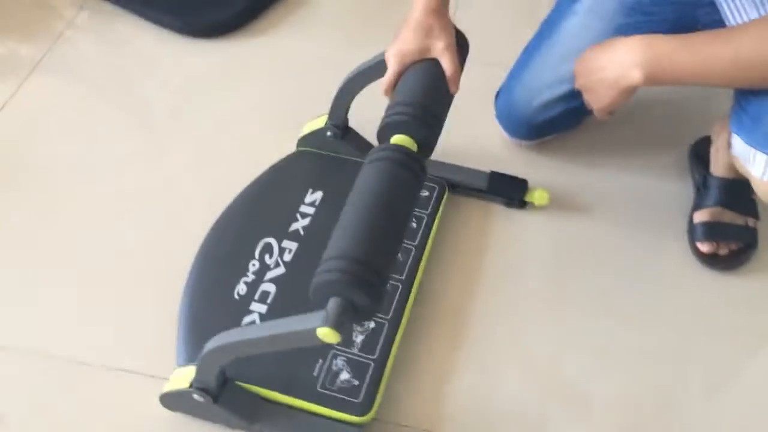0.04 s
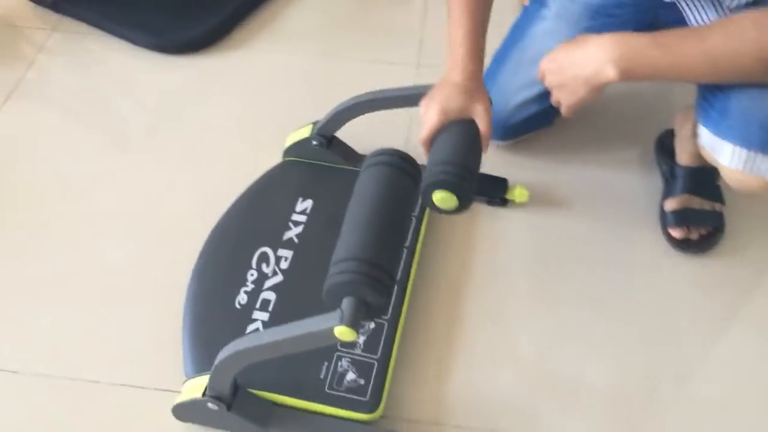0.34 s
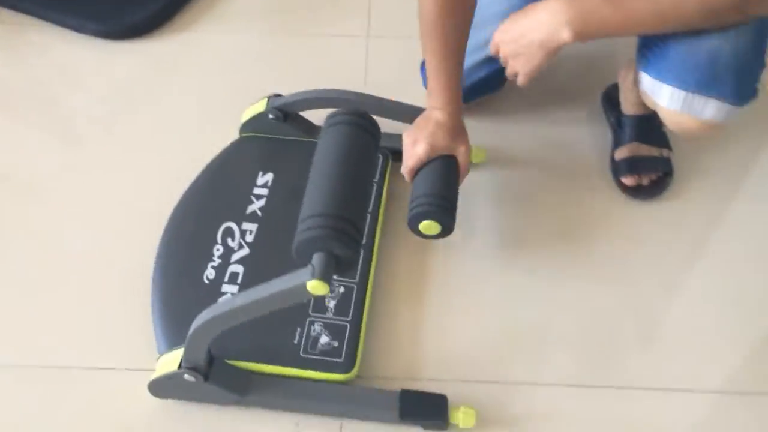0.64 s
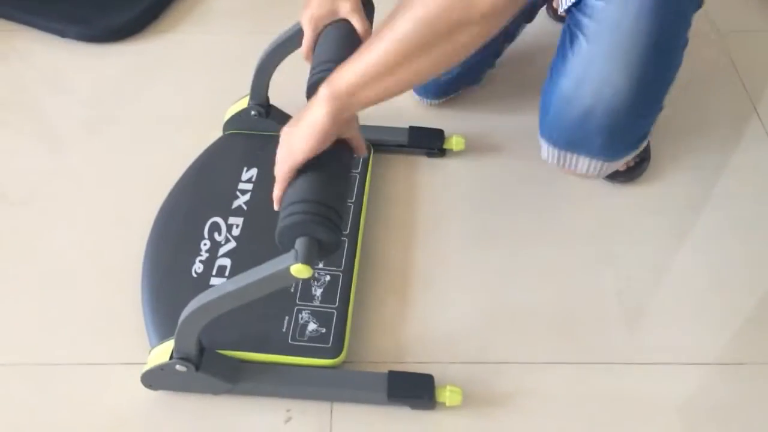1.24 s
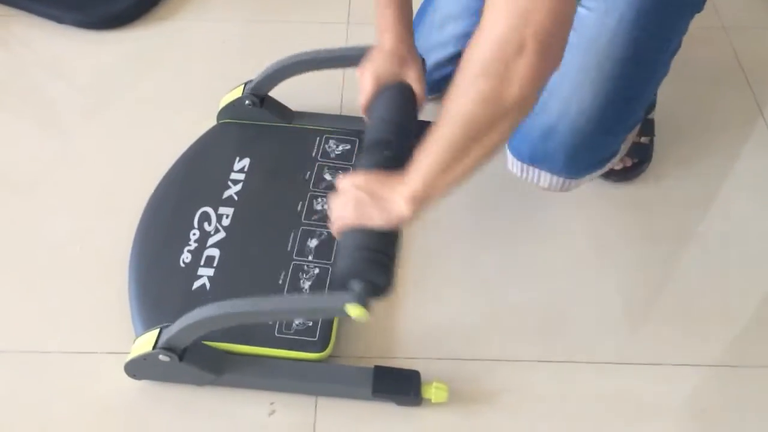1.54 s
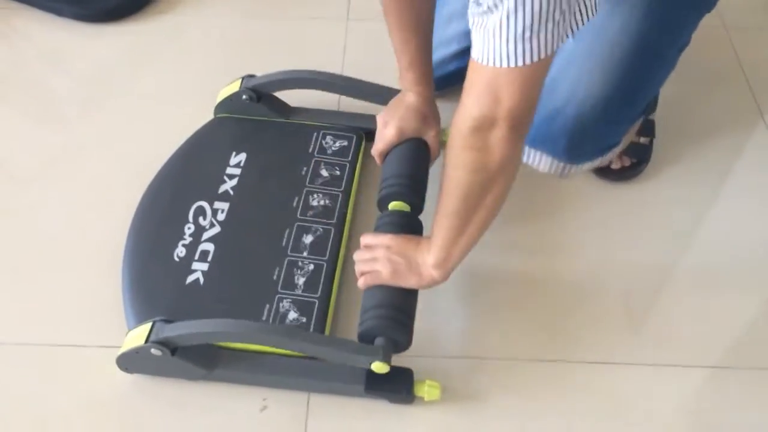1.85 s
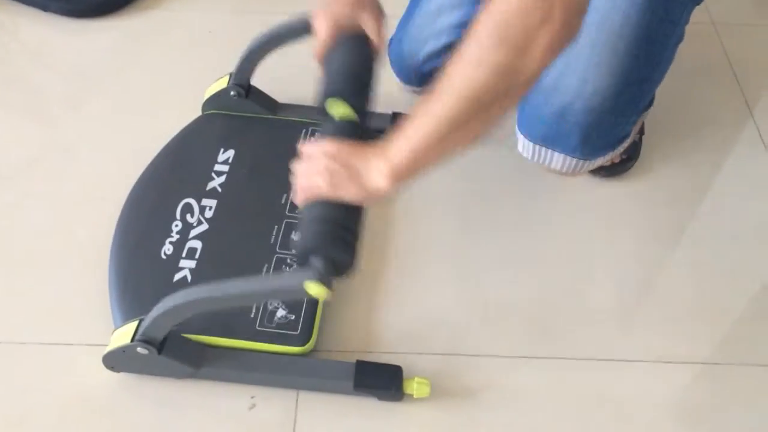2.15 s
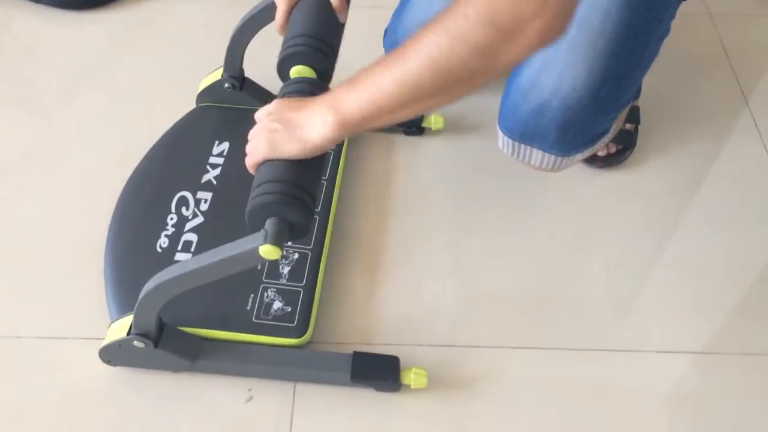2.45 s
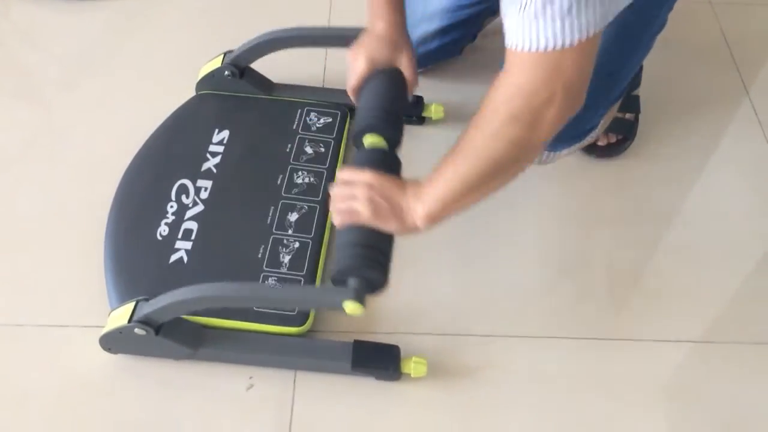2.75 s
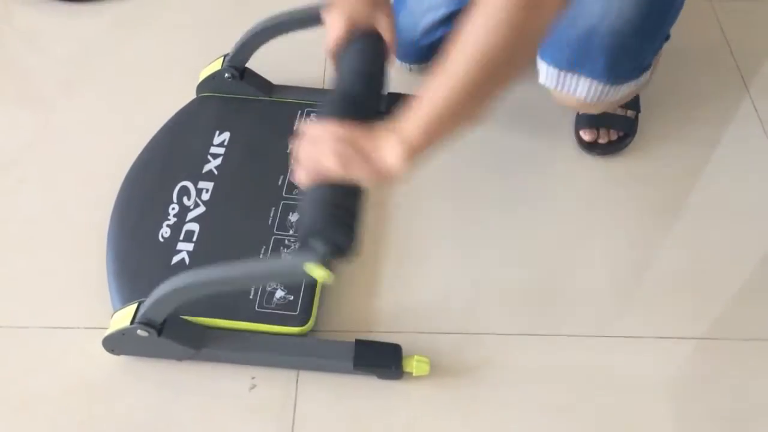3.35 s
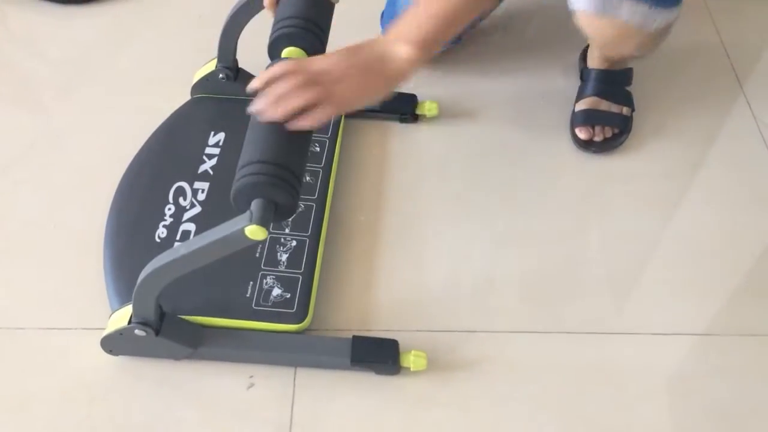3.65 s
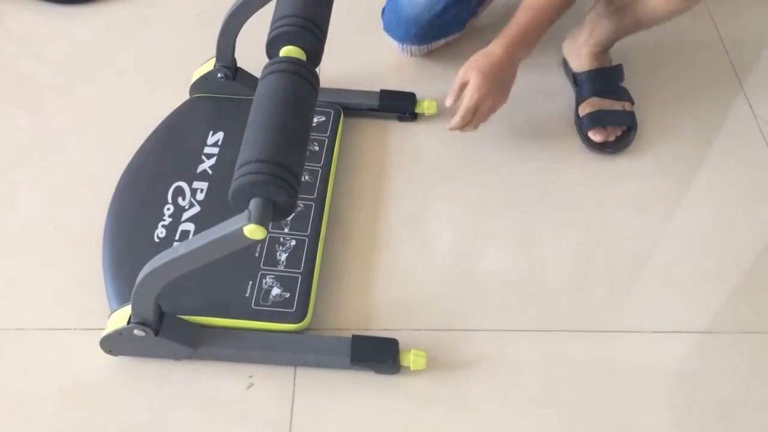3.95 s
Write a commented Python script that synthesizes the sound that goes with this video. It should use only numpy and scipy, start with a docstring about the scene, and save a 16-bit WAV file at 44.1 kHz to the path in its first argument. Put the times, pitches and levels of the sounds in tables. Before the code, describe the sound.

Sharp metal clacks from a sprung exercise machine handled on tiles, its pivot squeaking softly.

```python
"""A small sprung exercise machine is handled on the tiled floor of a hard room.
First its two steel arms clack against their stops and ring while the frame knocks on the tiles.
Then the padded bar is pushed down and let up: hands rub, foam slides, joints tick, a pivot squeaks,
with a soft clack at 1.2 s and a few light knocks. At 3.6 s, just after the loudest squeak,
an arm clacks and rings again, and a last rub trails off over the room tone."""
import sys
import numpy as np
from scipy import signal
from scipy.fft import rfft, irfft
from scipy.io import wavfile
from scipy.ndimage import uniform_filter1d

SR = 44100
rng = np.random.default_rng(int(sys.argv[2]) if len(sys.argv) > 2 else 0)


def put_to_file(sound):
    """Save the sound as 16-bit audio at rate SR, in the file named by the first command-line argument."""
    columns = np.atleast_2d(sound).T  # one column per channel
    safe = np.clip(columns, -1, 1)
    whole_steps = np.round(safe * 32767)
    wavfile.write(sys.argv[1], SR, whole_steps.astype(np.int16))


N = 176400

# an arm hits its stop: t/s, level/dB, treble corner/Hz, chatter/s, far arm ring/dB, near arm ring/dB
CLACKS = [(0.0527, -19, 12000, 0.0064, -56, -46), (.0815, -23.5, 14000, 0.0065, -67, -49.5),
          (0.1099, -11.5, 14000, 0.0081, -27.5, -43), (1.229, -31.5, 5100, 0.013, -72, -57),
          (3.5944, -22.5, 11300, 0.014, -66, -38)]
# the frame bumps the floor: t/s, level/dB, f/Hz, decay/s, frame boom/dB, grit/share
KNOCKS = [(.0495, -6.5, 960, 0.00085, -64.5, 0.25), (.052, -17.5, 215, 0.0096, -37, 0.34),
          (.055, -19.5, 560, 0.0035, -50, 0.17), (0.082, -38, 1110, 0.007, -57.5, 0.55),
          (.105, -23, 556, 0.0042, -48, 0.99), (.111, -16.5, 196, 0.0063, -29, 0.22),
          (.1125, -22.5, 488.5, 0.012, -63, 0.25), (1.191, -30.5, 538, 0.0053, -55, 0.27),
          (1.197, -26, 202, 0.019, -52, 0.22), (1.2185, -27.5, 528, 0.0072, -59, 0.07),
          (1.2227, -22.5, 193, 0.0091, -35, 0.11), (1.454, -26, 195, 0.0047, -40, 0.16),
          (1.477, -27, 178, 0.009, -63, 0.17), (1.537, -28.5, 181, 0.012, -46, 0.24),
          (1.578, -38, 256, 0.0086, -57, 0.24), (2.358, -32, 520, 0.007, -52.5, 0.16),
          (2.364, -36, 204, 0.015, -58, 0.32), (3.569, -30.5, 185, 0.017, -45, .12),
          (3.583, -26, 529, 0.007, -50, 0.28), (3.596, -33.5, 169.3, 0.019, -37, 0.14),
          (3.59, -29.5, 91, 0.016, -58, 0.2), (3.672, -30, 179.6, .016, -54, 0.31),
          (3.785, -35.5, 185, 0.015, -48.5, 0.35)]


def amp(db):
    """Decibels to gain."""
    return 10 ** (np.asarray(db) / 20)


def unit(x):
    """Scales to rms 1."""
    return x / np.sqrt(np.mean(x ** 2) + 1e-20)


def curve(points, hz):
    """Interpolates a table on a log-frequency axis."""
    f, value = np.transpose(points)
    return np.interp(np.log(hz + 1), np.log(f + 1), value)


def rolloff(ratio, order=2):
    """Filter slope in dB: flat below ratio 1, falling 6 dB an octave per order above it."""
    return -10 * np.log10(1 + ratio ** (2 * order))


def add(mix, s, sound):
    """Mixes a sound in at s seconds."""
    part = mix[max(round(s * SR), 0):][:len(sound)]
    part += sound[:len(part)]


def noise(colour, size):
    """Noise of rms 1, its spectrum shaped by colour(Hz) in dB."""
    gain = amp(colour(np.fft.rfftfreq(size, 1 / SR)))
    return unit(irfft(rfft(rng.standard_normal(size)) * gain, size))


def wander(size, smooth_s):
    """Smooth random drift of rms 1."""
    return noise(lambda f: rolloff(2 * f * smooth_s), size)


def room_tone(level_db=-49.5, low_cut_hz=38):
    """The room's steady bed of noise, mostly low rumble."""
    colour = [(15, -40), (25, -10.5), (81, -4), (103, -7), (202, -10.5), (231, -19.5), (271, -15.5),
              (363, -25.5), (573, -26), (673, -28.5), (1210, -30.5), (1630, -35), (2630, -38.5),
              (15000, -56.5)]  # spectrum: f/Hz, level/dB
    return amp(level_db) * noise(lambda f: curve(colour, f) + rolloff(low_cut_hz / (f + 1), order=3), N)


def reverb(sound, predelay_s=.004, flutter_db=1.5, flutter_s=.0055):
    """Dense reflections from tile and walls; the bass lingers longest."""
    decay = [(100, 1), (250, 0.71), (600, .6), (1300, 0.41), (3000, 0.66), (7000, 0.56), (14000, .36)]  # reverb time: f/Hz, t60/s
    wet = [(100, -8), (220, -2), (600, -6.5), (1500, -4.5), (5000, -7), (14000, -6)]  # reverb against the direct sound: f/Hz, level/dB
    hz, t, bands = signal.stft(rng.standard_normal(SR), SR, nperseg=256)
    rate = np.log(1000) / curve(decay, hz)[:, None]
    envelope = np.exp(-rate * t) * np.sqrt(2 * rate / SR)  # unit energy in each band
    tail = signal.istft(bands * amp(curve(wet, hz))[:, None] * envelope, SR, nperseg=256)[1]
    tail *= amp(flutter_db * wander(len(tail), flutter_s))  # reflections arrive unevenly
    out = np.zeros(N)
    add(out, predelay_s, signal.fftconvolve(sound, tail)[:N])
    return out


def friction(strokes, colour, grain_db=1):
    """Grainy friction noise swells and fades with each stroke."""
    t = np.arange(N) / SR
    power = sum(amp(db) ** 2 * np.exp(-((t - s) / half) ** 2) for s, half, db in strokes)
    grain = amp(grain_db * unit(uniform_filter1d(rng.standard_normal(N), size=180)))
    return np.sqrt(power) * unit(grain * noise(lambda f: curve(colour, f), N))


def slides():
    """Foam and cloth slide with a fine hiss."""
    strokes = [(.01, 0.1, -52.5), (.47, 0.14, -61), (.62, .05, -64.5), (1.52, .012, -66),
               (2.205, 0.0081, -61.5), (3.05, 0.2, -73), (3.785, 0.0094, -57.5)]  # swells of hiss: centre t/s, half length/s, level/dB
    colour = [(1000, -7.5), (3300, 0.5), (5000, -1.5), (9000, -6.5), (15000, -12)]  # spectrum: f/Hz, level/dB
    return friction(strokes, colour)


def rubs():
    """Hands and foam rollers rub with a dull rustle."""
    strokes = [(0.02, 0.036, -61.5), (0.439, 0.058, -56), (0.613, .05, -67), (1.501, 0.056, -54.5),
               (1.61, 0.082, -55), (1.804, 0.11, -59.5), (2.118, 0.024, -54.5), (2.207, 0.022, -53),
               (2.649, 0.016, -66.5), (2.989, 0.085, -59.5), (3.106, 0.052, -61), (3.438, 0.1, -55),
               (3.92, 0.36, -57.5)]  # swells of rustle: centre t/s, half length/s, level/dB
    colour = [(150, -6), (450, 5.5), (750, 2), (1300, 0.5), (2000, -5), (3200, -11.5), (5000, -20.5),
              (10000, -22.5), (15000, -30.5)]  # spectrum: f/Hz, level/dB
    return friction(strokes, colour)


def squeaks(slip_s=.0017):
    """The pivot sticks and slips; uneven slips add a tone at half the pitch."""
    # squeaks: t/s, length/s, level/dB, start f/Hz, end f/Hz, pitch arch/share, subtone/dB, jitter/share
    glides = [(0.417, 0.079, -57, 1290, 1342, 0.0049, -21.5, 0.019),
              (.525, 0.06, -52, 1373, 1438, 0.0045, -24.5, .006),
              (1.677, 0.057, -55.5, 1385, 1426, 0.0066, -20, .015),
              (2.191, 0.028, -48.5, 1333, 1292, .03, 0, .15),
              (3.394, 0.057, -44, 1236, 1153, .085, -8.5, 0.035)]
    out = np.zeros(N)
    for s, length, db, start_hz, end_hz, arch, sub_db, rough in glides:
        progress = np.arange(0, length, 1 / SR) / length
        arc = np.sin(np.pi * progress)
        jitter = wander(SR, slip_s)[:len(progress)]
        hz = (start_hz + (end_hz - start_hz) * progress) * (1 + arch * arc + rough * jitter)
        phase = 2 * np.pi * np.cumsum(hz) / SR
        tone = np.sin(phase) + amp(sub_db) * np.sin(phase / 2)
        add(out, s, amp(db) * np.sqrt(abs(arc)) * tone)
    return out


def ticks(top_hz=12000):
    """Short dry clicks, and the bright snap of an arm hitting its stop."""
    clicks = [(.0425, -29, 1190, 1.8, 0.01), (.0815, -21.5, 4400, .4, 0.009),
              (1.185, -43.5, 1700, 0.93, 0.013), (1.1915, -44.5, 1200, 0.74, 0.01),
              (1.22, -43, 1800, 1.7, 0.012), (1.229, -40.5, 1430, .3, 0.025),
              (1.6302, -44, 7200, 0.19, .004), (1.6314, -39, 3740, 2.3, 0.0026),
              (2.338, -46, 1700, 0.81, .012), (2.359, -50.5, 1500, 1.3, 0.0058),
              (3.488, -50, 1180, 1.6, 0.01), (3.547, -44, 900, 1.3, 0.015),
              (3.5537, -36, 1200, 1.37, 0.017), (3.595, -21.5, 4930, 0.22, 0.004)]  # clicks and snaps: t/s, level/dB, centre f/Hz, width/octaves, decay/s
    out, t = np.zeros(N), np.arange(4096) / SR
    for s, db, hz, octaves, decay in clicks:
        burst = noise(lambda f: -20 * np.log10(1 + (np.log2((f + 1) / hz) / octaves) ** 2)
                      + rolloff(f / (3.2 * hz)) + rolloff(f / top_hz), len(t))
        add(out, s, amp(db) * burst * np.exp(-t / decay))
    return out


def ring(modes, rise_s, waver=0, waver_s=.016):
    """One second of dying modes; with waver, a loose part makes each sway in level and phase."""
    t = np.arange(SR) / SR
    out = np.zeros(SR)
    for hz, db, t60 in modes:
        sway = 1 + waver * (wander(SR, waver_s) + 1j * wander(SR, waver_s)) if waver else 1
        out += amp(db - 60 * t / t60) * (sway * np.exp(2j * np.pi * hz * t)).imag
    return (1 - np.exp(-t / rise_s)) * out


def frame_boom():
    """The frame booms on after each knock."""
    modes = [(82.4, -7.5, .6), (120, -14.5, 0.36), (186.8, -9.5, 0.34), (198.7, 3.5, 0.8), (219, -4.5, 0.7),
             (258, -11.5, 1), (413, -7, 0.13), (477, -8, 0.5)]  # frame resonances: f/Hz, level/dB, t60/s
    boom = ring(modes, rise_s=.008)
    out = np.zeros(N)
    for s, _, _, _, boom_db, _ in KNOCKS:
        add(out, s, amp(boom_db) * boom)
    return out


def knocks():
    """The frame bumps the tiles: short, damped thuds with grit around their pitch."""
    out, t = np.zeros(N), np.arange(8192) / SR
    for s, db, hz, decay, _, grit_share in KNOCKS:
        grit = noise(lambda f: rolloff(f / (2.1 * hz)) + rolloff(.5 * hz / (f + 1)), len(t))
        thud = np.sin(2 * np.pi * hz * t) + grit_share * grit
        envelope = 2 * t / decay * np.exp(1 - 2 * t / decay)
        add(out, s, amp(db) * envelope * thud)
    return out


def arm_ring():
    """Both steel arms ring on after each clack."""
    # resonances of each arm: f/Hz, level/dB, t60/s
    far_modes = [(654, -13.5, .6), (910, -14, .6), (1010, -11.5, 0.35), (1190, -12, 0.42),
                 (1218, -10.5, .55), (1320, -14.5, .55), (3417, -9.5, .35), (3455, 2.5, 0.39),
                 (4077, -7, .44), (4570, -12, .4), (6509, -12.5, .33), (8130, -6.5, 0.072)]
    near_modes = [(967, -4.5, .4), (1112, -3.5, 0.18), (1280, -4, 0.8), (2470, -5, 0.44), (4130, -8, 0.3),
                  (4400, -7.5, 0.3), (4790, -3.5, 0.22), (5830, -7.5, .3), (9400, -14, .2),
                  (13200, -15, .1)]
    far, near = (ring(modes, rise_s=.002, waver=.4) for modes in (far_modes, near_modes))
    out = np.zeros(N)
    for s, _, _, _, far_db, near_db in CLACKS:
        add(out, s, amp(far_db) * far + amp(near_db) * near)
    return out


def clacks(attack_s=.0005):
    """A steel arm chatters on its stop for a few milliseconds."""
    colour = [(60, -9.5), (200, 4), (450, 1.5), (750, -5), (1200, 6), (1800, -2), (2900, -5), (4300, -1),
              (7000, -4), (10000, -8), (13500, -6.5), (15200, -13)]  # chatter spectrum: f/Hz, level/dB
    out, t = np.zeros(N), np.arange(4096) / SR
    for s, db, corner_hz, chatter_s, _, _ in CLACKS:
        burst = noise(lambda f: curve(colour, f) + rolloff(f / corner_hz), len(t))
        envelope = np.minimum(t / attack_s, 1) * np.exp(-(t / chatter_s) ** 1.12)
        add(out, s, amp(db) * envelope * burst)
    return out


def machine(low_cut_hz=65):
    """The machine's hits and friction heard from one direction; it radiates little deep bass."""
    sound = clacks() + knocks() + ticks() + squeaks() + rubs() + slides()
    return signal.sosfilt(signal.butter(2, low_cut_hz, "highpass", fs=SR, output="sos"), sound)


def scene(walls=3):
    """Room tone, the machine, its reflections and its ringing; each wall returns its own view of it."""
    bed = room_tone()
    direct = machine()
    reflections = sum(reverb(machine()) for _ in range(walls)) / np.sqrt(walls)
    return (bed + direct + reflections + frame_boom() + arm_ring())[None]


def record(dry):
    """A steep low-pass trims the top treble."""
    lowpass = signal.firwin(255, 15250, window=("kaiser", 8), fs=SR)  # edge in Hz
    return signal.oaconvolve(dry, lowpass[None], "same")


dry = scene()
out = record(dry)
put_to_file(out)
```